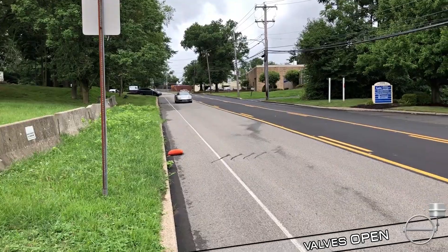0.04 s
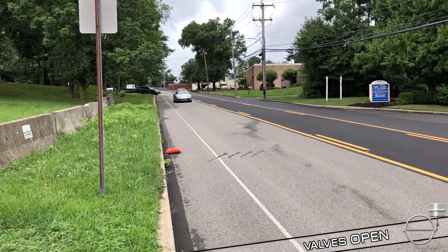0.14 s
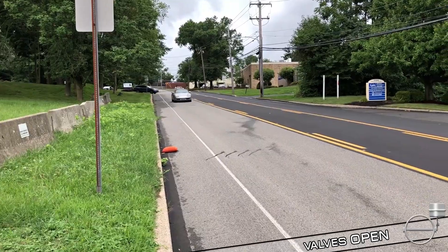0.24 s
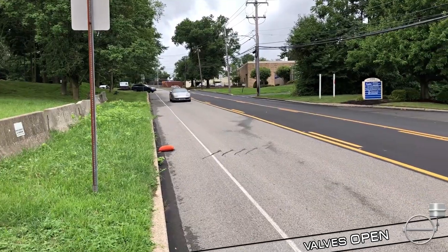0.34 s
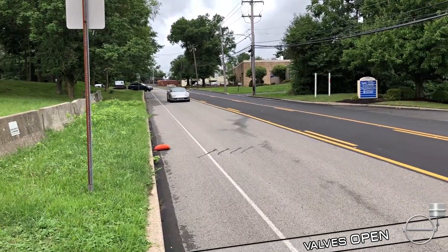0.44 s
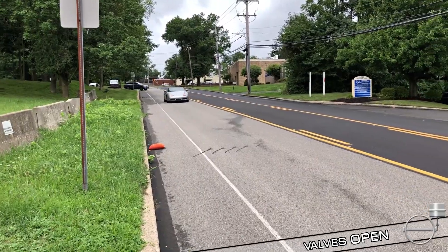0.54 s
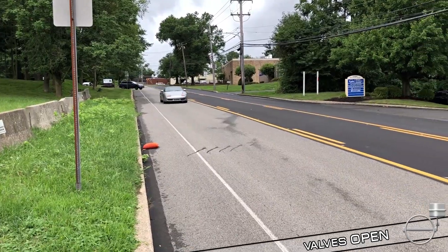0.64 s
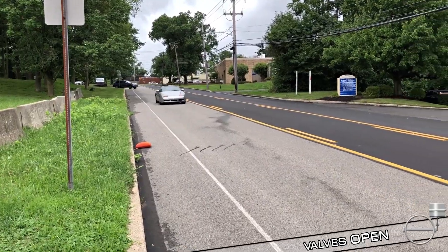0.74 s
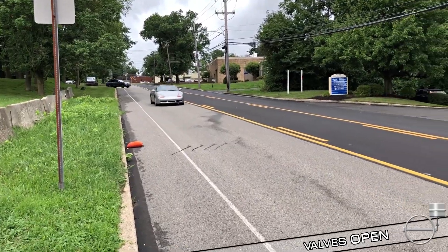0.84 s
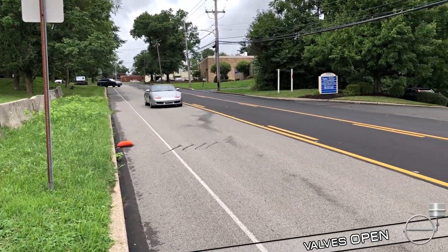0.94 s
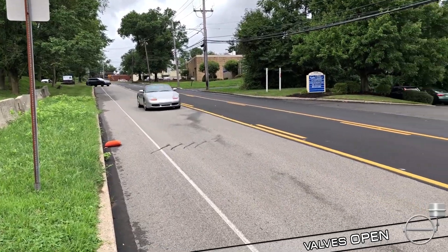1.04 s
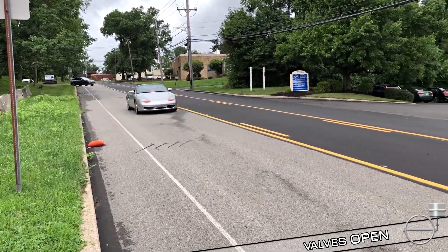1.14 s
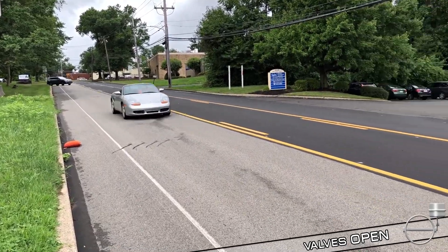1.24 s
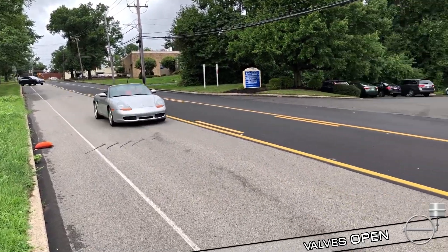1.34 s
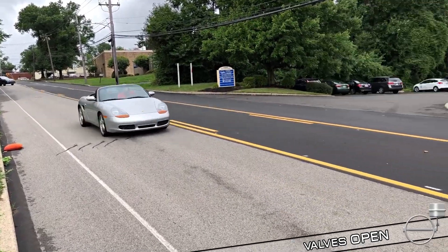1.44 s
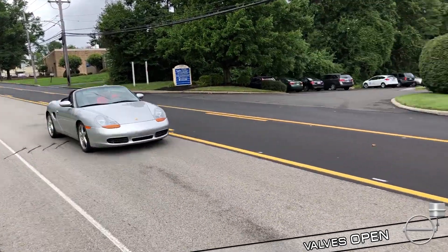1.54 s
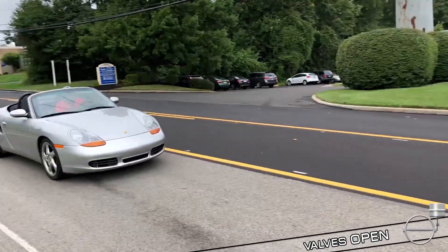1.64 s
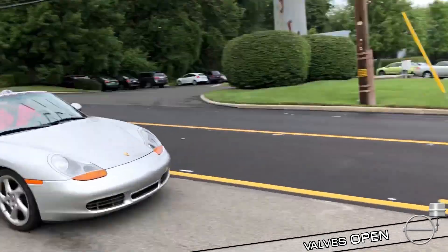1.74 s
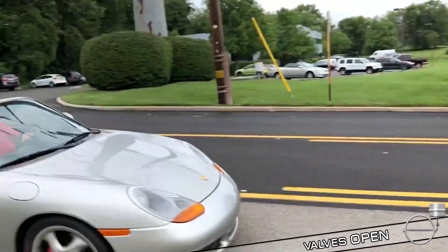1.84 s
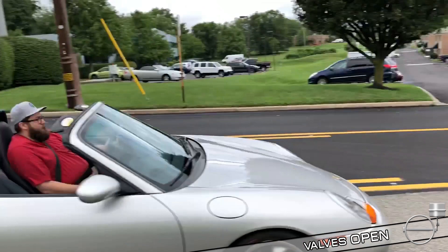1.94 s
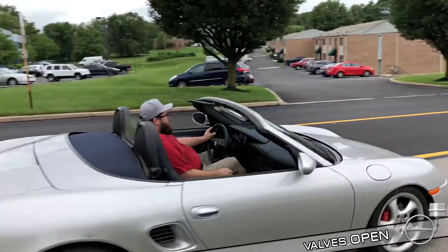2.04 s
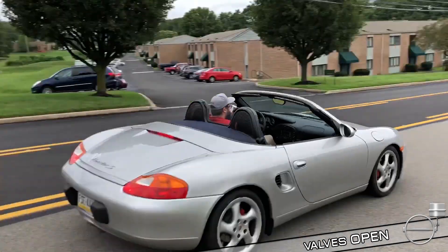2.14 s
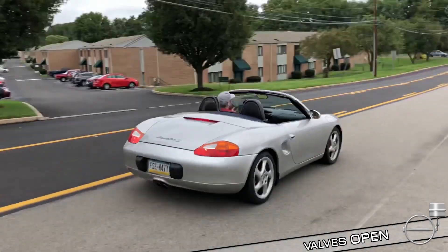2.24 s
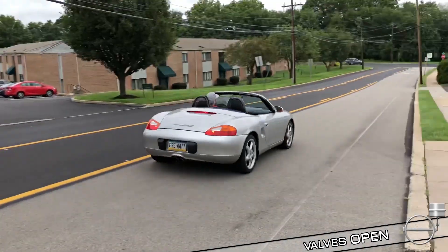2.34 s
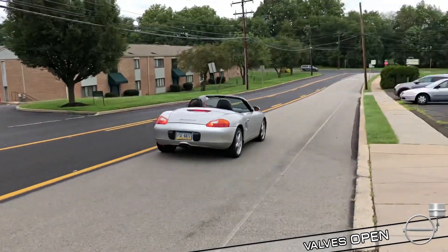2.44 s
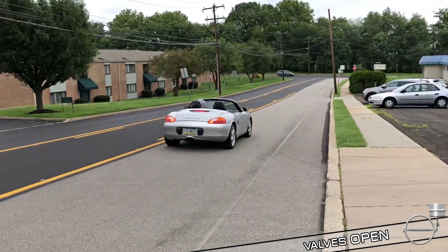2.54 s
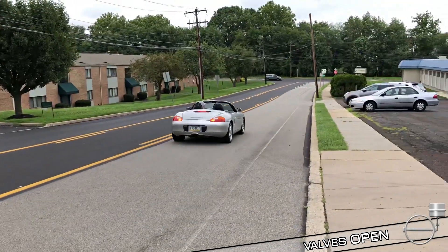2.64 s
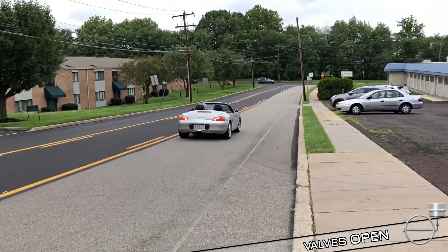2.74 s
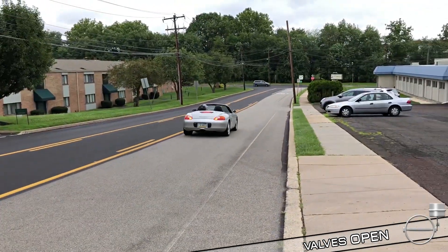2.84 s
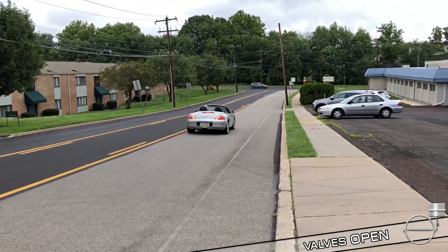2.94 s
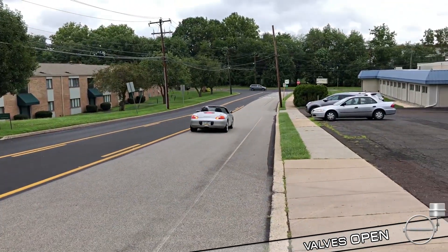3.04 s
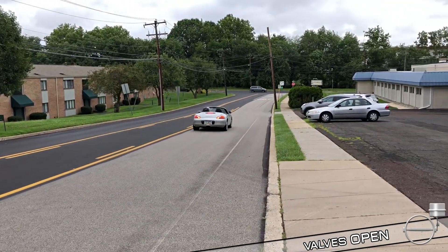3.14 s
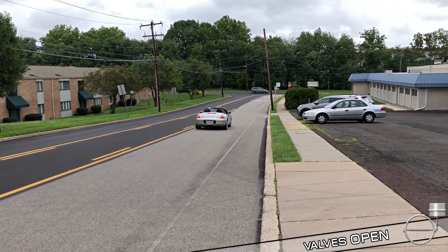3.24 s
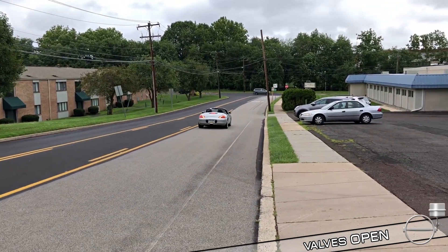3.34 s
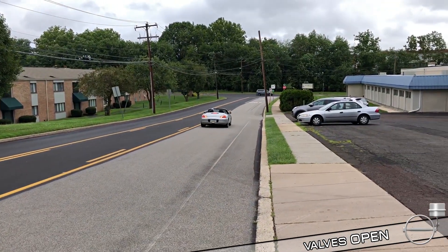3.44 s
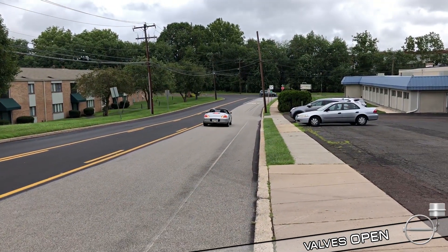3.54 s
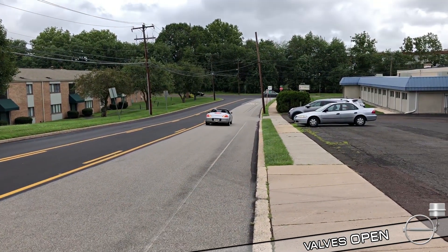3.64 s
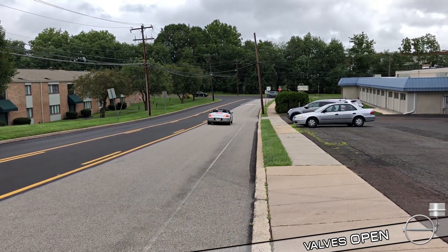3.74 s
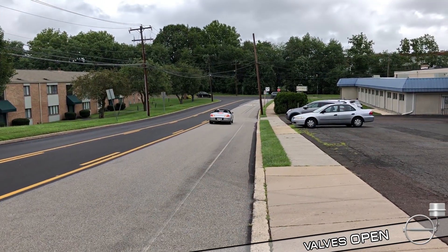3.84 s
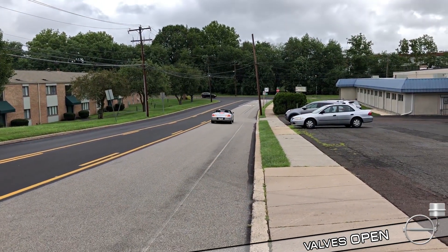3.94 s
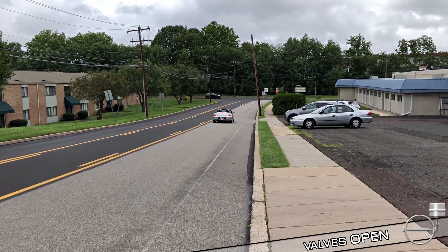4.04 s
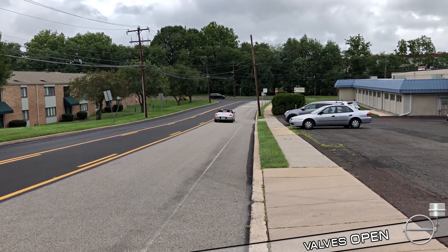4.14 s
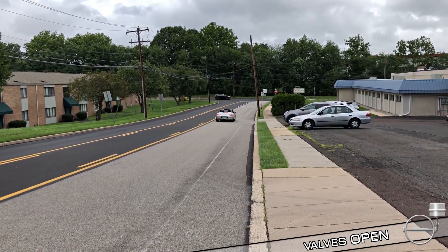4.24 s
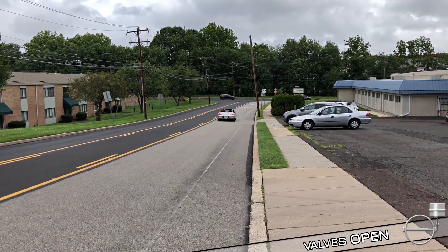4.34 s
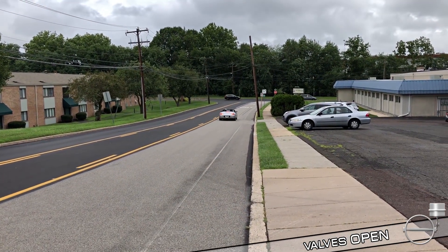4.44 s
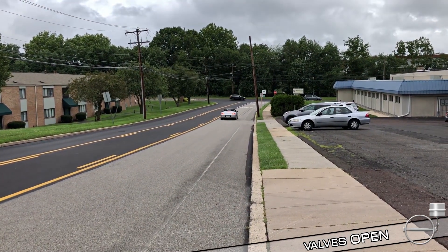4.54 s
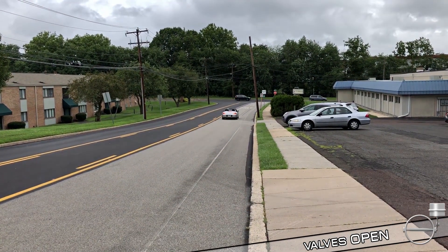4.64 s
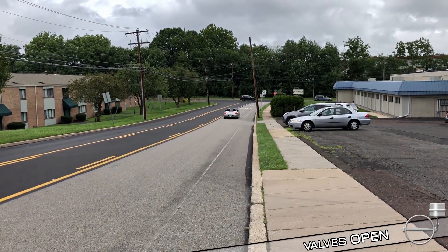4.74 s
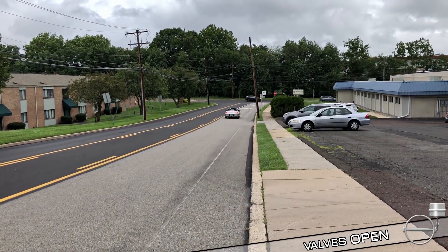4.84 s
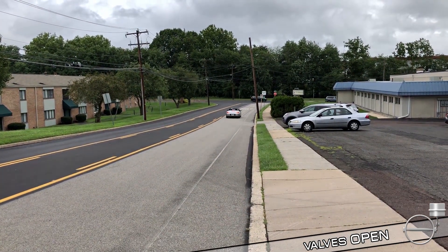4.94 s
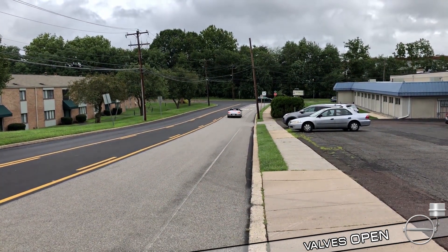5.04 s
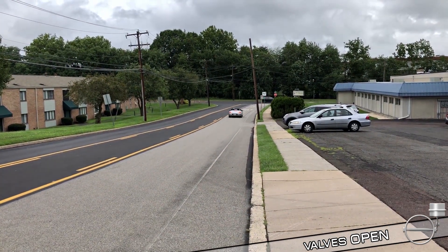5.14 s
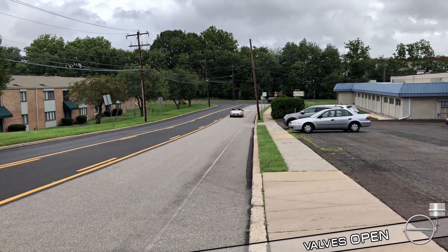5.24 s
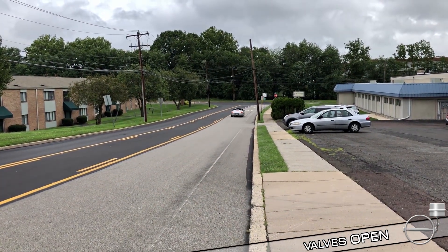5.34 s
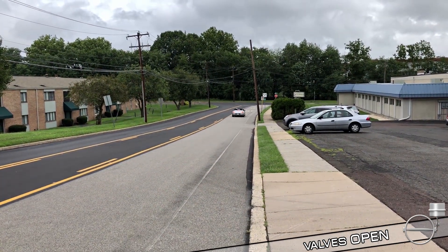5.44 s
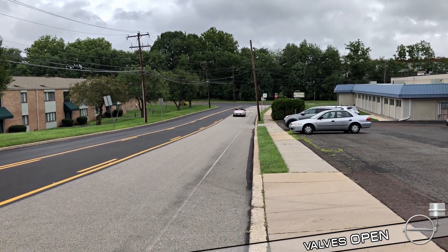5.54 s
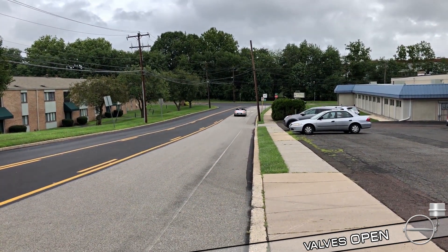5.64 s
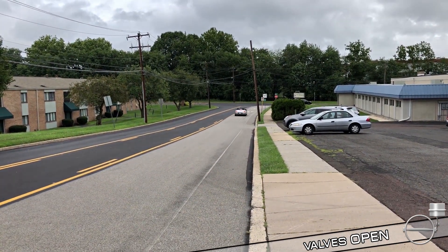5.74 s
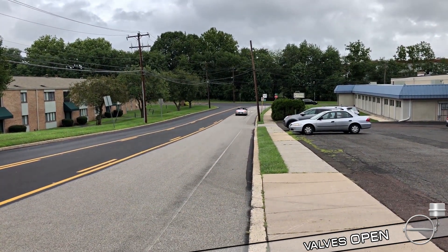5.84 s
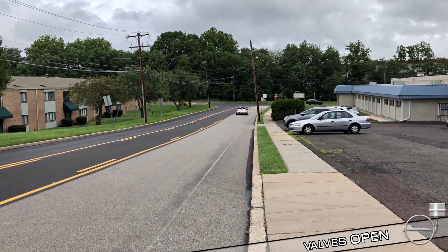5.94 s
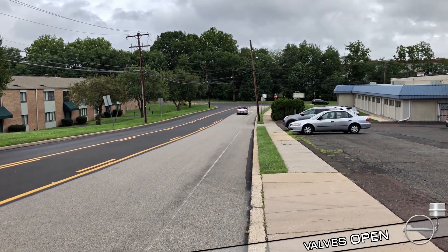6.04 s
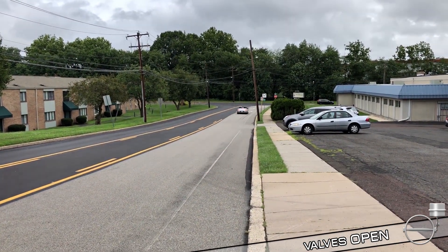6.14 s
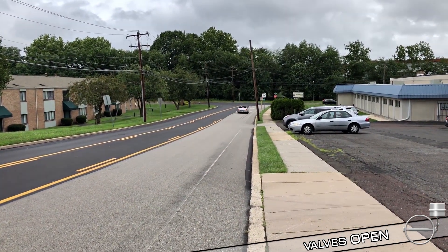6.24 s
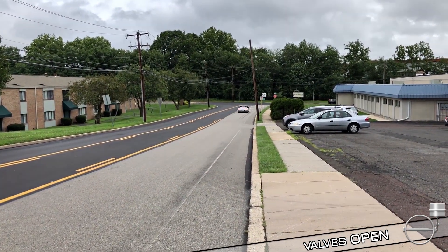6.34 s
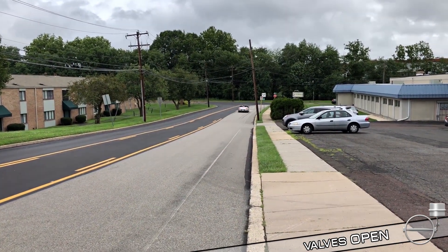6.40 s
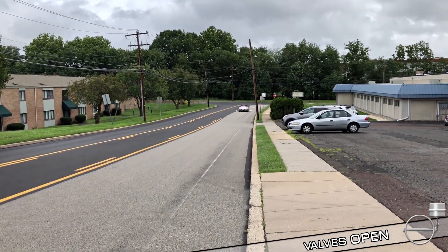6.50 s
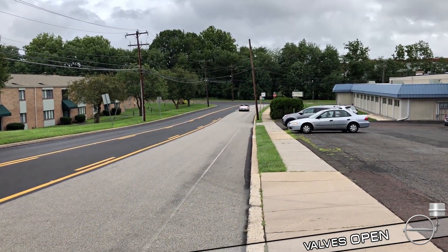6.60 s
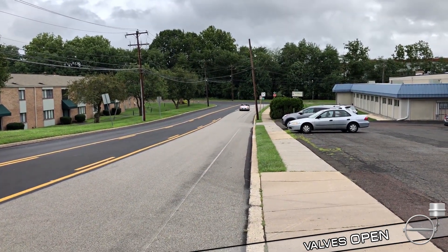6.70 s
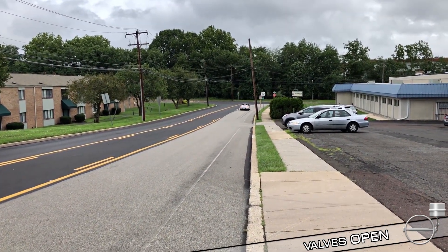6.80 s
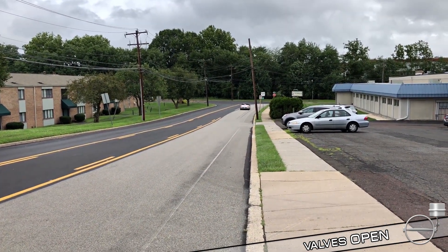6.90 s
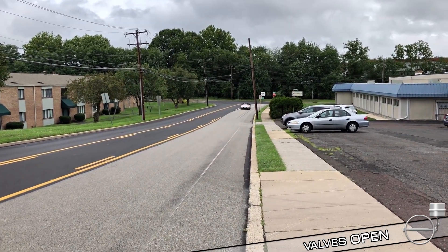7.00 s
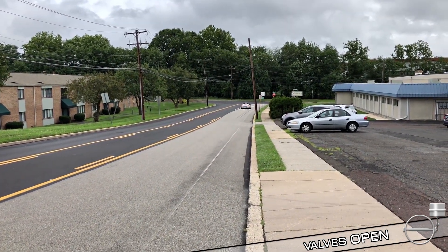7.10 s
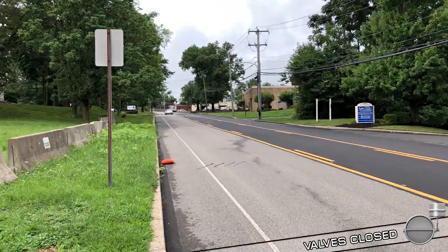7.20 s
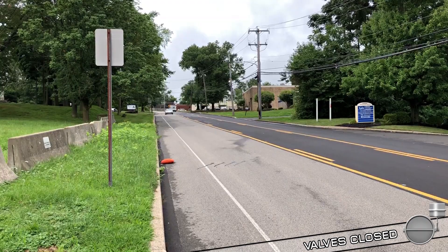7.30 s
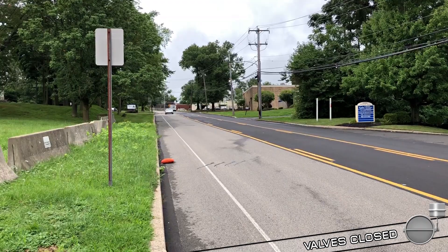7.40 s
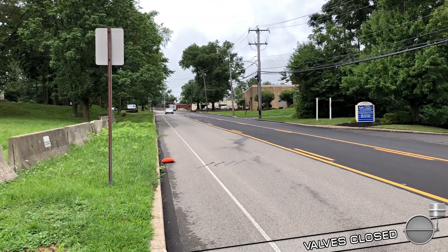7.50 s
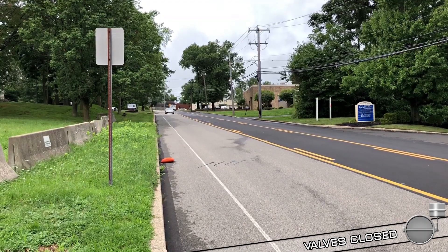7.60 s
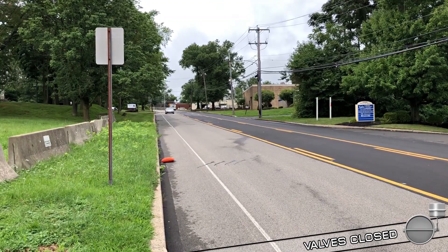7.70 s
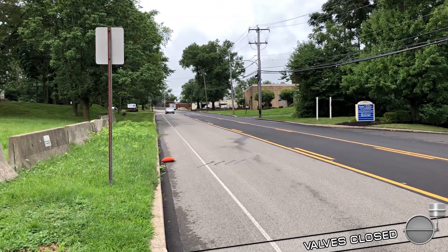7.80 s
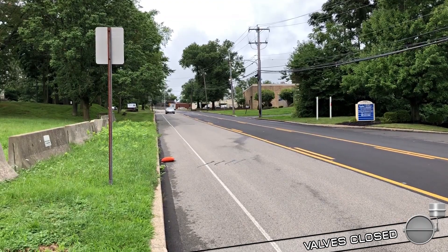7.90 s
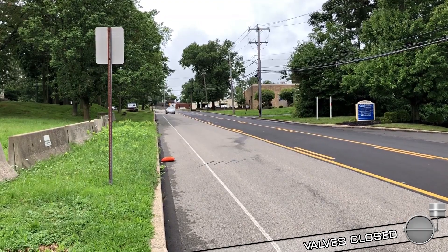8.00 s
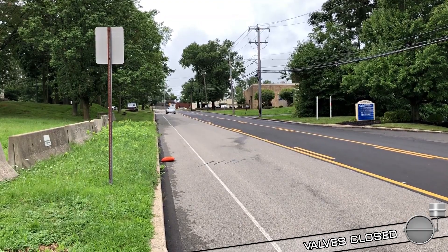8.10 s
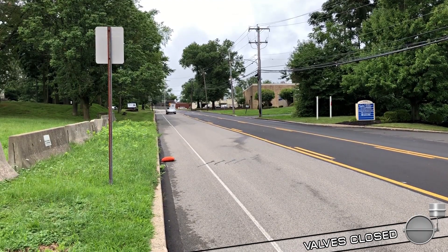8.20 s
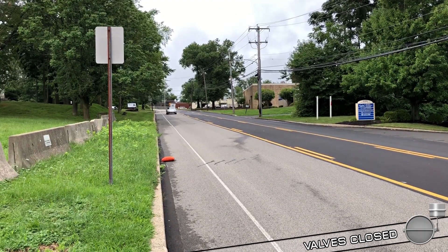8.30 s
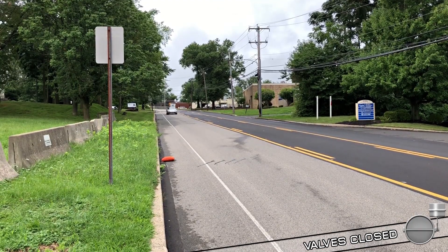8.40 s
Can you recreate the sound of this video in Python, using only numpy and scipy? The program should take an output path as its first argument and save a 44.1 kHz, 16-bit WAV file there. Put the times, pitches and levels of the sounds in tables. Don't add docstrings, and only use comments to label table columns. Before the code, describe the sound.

A sports car rushes past a roadside microphone with a throttle blip, draws away droning, then approaches again faintly after one sharp exhaust crack.

```python
import sys
import numpy as np
from scipy import signal
from scipy.fft import rfft, irfft, next_fast_len
from scipy.io import wavfile
from scipy.ndimage import uniform_filter1d, map_coordinates

SR = 44100
rng = np.random.default_rng(int(sys.argv[2]) if len(sys.argv) > 2 else 0)


def to_wav(sig):
    pcm = np.clip(np.atleast_2d(sig), -1, 1) * 32767
    pcm = np.round(pcm).astype(np.int16)
    wavfile.write(sys.argv[1], SR, pcm.T)


def to_linear_factor(level_db):
    exponent = np.asarray(level_db, float) / 20
    return 10 ** exponent


N = 373086

# [t/s, level/dB]
WIND_BUFFETS = [
    [(0.0, -23.5), (0.12, -26), (0.23, -31), (0.34, -38), (0.41, -60)],
    [(1.9, -67), (1.964, -53), (2.016, -48), (2.062, -31), (2.3, -57)],
]
# [f/Hz, density/dB per Hz]
GUST_SPECTRUM = [(15, -19), (30, -1.5), (60, -6.5), (120, -8.5), (230, -10.5), (320, -23), (450, -35.5)]
# [t/s, f/Hz]
BANK_RATE = [(0, 106.3), (.5, 107.8), (.96, 108.4), (1.9, 95.03), (2.05, 95), (2.35, 73.74), (2.88, 104.5),
             (3.12, 100.5), (4.3, 95.4), (4.9, 90.16), (5.2, 87.15), (5.3, 95.5), (5.45, 100.7),
             (5.9, 79.6), (6.2, 87.14), (6.88, 112.3), (7.1, 104.6), (7.32, 105.2)]
BANK_RATE_AGAIN = [(7.6, 98.9), (8.46, 111.3)]
# [t/s, level/dB]
NEARNESS = [(0, -34.5), (.8, -30.5), (1.13, -28.5), (1.5, -25), (1.77, -20), (2.0, -20.5), (2.22, -20.5),
            (2.5, -25), (2.62, -27), (2.83, -26.5), (3.02, -28.5), (3.5, -32), (4.1, -34), (5.2, -37.5),
            (6.5, -39.5), (7.1, -41), (7.55, -45.5), (8.46, -41.5)]
# [t/s, level/dB]
BANK_DRONE = [(0, -32.5), (.2, -35), (.45, -54), (.96, -46), (1.08, -31.5), (1.42, -25.5), (1.85, -18),
              (2.1, -11.5), (2.42, -26), (3.0, -31), (4.9, -37), (5.6, -44), (6.25, -39.5), (6.9, -36),
              (7.2, -33.5), (7.55, -53), (8.1, -53), (8.46, -47)]
# [t/s, level/dB, half length/s]
DRONE_SWINGS = [(.72, 8, 0.11), (2.087, 3.5, 0.059), (1.56, -13, 0.11), (3.258, -7, 0.032), (3.473, 9, .05),
                (3.598, -16, 0.085), (4.322, -7, 0.059), (5.047, -8, .06), (5.656, 4, 0.025),
                (5.992, -6, 0.085), (7.81, -15, 0.067), (3.92, 1, .04), (6.435, -9, 0.11), (7.02, -1, .04)]
# [start t/s, end t/s, firing line level/dB, fading/dB per s]
LOADS = [
    (0, 0.83, -34, -0.5),
    (2.706, 4.95, -30.5, 7),
    (6.504, 7.283, -43.5, 2),
]
# [start t/s, end t/s, firing line level/dB, bark level/dB, bark lag/s]
THROTTLE_BLIPS = [
    (1.931, 2.049, -16, -39, -0.0085),
    (5.31, 5.405, -22.5, -29.5, 0.024),
]
# [f/Hz, width/Hz, level/dB]
THIRD_BOOM = (242, 38, 23.9)
# [multiple of the engine cycle, level/dB]
UPPER_LINES = [(12, -1.5), (16, -3), (18, -4), (13, -16), (14, -12), (20, -11.5)]
BARK_LINES = [(12, -15), (15, -2.5), (18, 2), (21, -22), (24, -20), (27, -4.5), (30, -6), (33, -1.5),
              (36, -5), (39, -2)]
# [f/Hz, width/Hz, level/dB]
PIPE_MODES = [(1150, 340, 3.5), (2210, 430, 5.5), (3380, 1100, -8.5), (6960, 2000, -17), (13000, 4000, -38)]
# [f/Hz, density/dB per Hz]
BODY_SPECTRUM = [(30, -45), (60, 2.5), (120, 2.5), (300, 1.5), (400, -11.5), (520, -3.5), (700, -2.5),
                 (1000, -17)]
TREAD_SPECTRUM = [(260, -26), (450, -6.5), (575, -7), (621, -8.5), (767, -12), (849, -3), (972, -1),
                  (1360, -5), (1680, -3.5), (2080, -5.5), (2730, -18.5), (3400, -31.5), (4420, -50),
                  (7480, -120)]
HISS_SPECTRUM = [(1530, -10), (2600, -1), (2980, 0), (4260, -9), (5760, -9.5), (8000, -19.5), (10400, -22),
                 (17600, -120)]
AIR_SPECTRUM = [(4120, 0.5), (7000, -1), (8110, -2), (9800, -7), (11200, -6.5), (12600, -1.5),
                (14900, -9.5), (15750, -7)]
# [level when abreast/dB, growth with nearness, extra from behind/dB, extra under load/dB]
ROAD_LAYERS = [
    (-29, 1.183, 3.5, -0.5),
    (-21, 1.081, -0.38, -0.05),
    (-36.5, 1.26, 4, 0.5),
    (-50, 1.8, 9, 5.5),
]
# [f/Hz, density/dB per Hz]
FAR_SPECTRUM = [(20, -35), (60, -2), (130, 2), (400, -15), (1100, -19), (2500, -23), (8000, -38),
                (15700, -53)]
# [t/s, level/dB, centre f/Hz]
BRAKE_SQUEAL = [(1.06, -71, 13800), (1.124, -52, 13800), (1.234, -51.5, 13800), (1.42, -38.5, 13700),
                (1.432, -41, 13600), (1.454, -40, 13930), (1.784, -33.5, 13700), (1.92, -54, 13390)]
# [start t/s, end t/s, level/dB, f/Hz, width/Hz]
NOISE_SWELLS = [(3.16, 3.32, -50, 3008, 2070), (3.499, 4.404, -37, 1020, 260),
                (4.05, 4.143, -52, 4990, 3500), (4.69, 5.097, -42, 1324, 300.2),
                (6.72, 7.2, -45.5, 2200, 610), (6.78, 7.247, -59.5, 5090, 2200),
                (1.634, 1.764, -34.5, 248, 25.04), (1.93, 2.012, -25, 750, 120),
                (2.072, 2.19, -33, 3700, 2200), (7.753, 8.46, -59.5, 3680, 804),
                (8.251, 8.459, -65, 947, 60)]
# [t/s, level/dB, f/Hz]
CRICKET_CHIRPS = [(7.125, -66, 9500), (7.1841, -59, 9190), (7.2908, -65, 9500), (7.4584, -64, 9480),
                  (7.5053, -58, 9150), (7.5494, -73, 9700), (7.6443, -66, 9380), (7.7188, -58, 9090),
                  (7.7894, -67, 9740), (7.8241, -64, 9480), (7.9197, -57, 9130), (8.027, -63, 9540),
                  (8.1604, -57, 9070), (8.2446, -61, 9540), (8.321, -65, 8820), (8.3958, -58, 9150)]
# [t/s, level/dB]
EXHAUST_POPS = [
    (7.568, -36),
    (7.5754, -27.5),
    (7.578, -38),
    (7.587, -36),
]

PASS_S, TURN_S, CUT_S = 1.86, 0.05, 7.43
PULL_RISE, PULL_FALL = 85, 95.6
BLIP_RISE, BLIP_FALL, ECHO_S = 213, 360, 0.14


def unit(x):
    return x / np.sqrt(np.mean(x ** 2) + 1e-20)


def curves(rows, outside=None):
    s, *cols = np.transpose(rows)
    return [np.interp(np.arange(N) / SR, s, c, outside, outside) for c in cols]


def wobble(rate):
    return map_coordinates(rng.standard_normal(int(N * rate / SR) + 4), [np.arange(N) * rate / SR])


def filtered(x, response):
    m = next_fast_len(N + SR // 4)
    return irfft(rfft(x, m) * response(np.fft.rfftfreq(m, 1 / SR)), m)[:N]


def rush(spectrum, patchy_db):
    z = signal.stft(rng.standard_normal(N), nperseg=512)[2]
    field = uniform_filter1d(uniform_filter1d(rng.standard_normal(z.shape), 5, 0), 10, 1)
    noise = signal.istft(z * to_linear_factor(patchy_db * unit(field)), nperseg=512)[1][:N]
    f, db = np.transpose(spectrum)
    return unit(filtered(noise, lambda hz: to_linear_factor(np.interp(np.log(hz + 1), np.log(f), db, -120, -120))))


def held(start, end, rise, fall):
    t = np.arange(N) / SR
    return -rise * np.maximum(start - t, 0) - fall * np.maximum(t - end, 0)


def rear():
    t = np.arange(N) / SR
    return (np.tanh((t - PASS_S) / TURN_S) - np.tanh((t - CUT_S) / TURN_S)) / 2


def blip(start, end, echo_db):
    stab = to_linear_factor(held(start, end, BLIP_RISE, BLIP_FALL))
    return stab + to_linear_factor(echo_db + held(end, end + ECHO_S, BLIP_RISE, BLIP_FALL))


def blips_open():
    return sum(to_linear_factor(held(a, b, BLIP_RISE, BLIP_FALL)) for a, b, *_ in THROTTLE_BLIPS)


def wind():
    gust_db, wake_db = (curves(rows, -120)[0] for rows in WIND_BUFFETS)
    lumps = to_linear_factor(1.5 * wobble(34.6))
    gust = unit(lumps * rush(GUST_SPECTRUM, patchy_db=3.0))
    wake = rush([(15, -7), (40, -2), (70, -17), (120, -40)], patchy_db=8.0)
    return to_linear_factor(gust_db + 5.5) * gust + to_linear_factor(wake_db) * wake


def orders(cycle, table, drift, flutter_db):
    total = 0
    for k, db in table:
        gain = np.sqrt(2) * to_linear_factor(db + flutter_db * wobble(12))
        lag = -0.12 * k * np.log(k)
        total = total + gain * np.cos(2 * np.pi * k * cycle + drift * wobble(8) + lag)
    return total


def exhaust(cycle, bank_hz, near_db):
    t = np.arange(N) / SR
    pull = sum(to_linear_factor(db - fade * (t - a) + held(a, b, PULL_RISE, PULL_FALL)) for a, b, db, fade in LOADS)
    stab = sum(to_linear_factor(db) * blip(a, b, echo_db=-12) for a, b, db, _, _ in THROTTLE_BLIPS)
    echo_db = sum(db * np.exp(-((t - s) / w) ** 2) for s, db, w in DRONE_SWINGS)
    bank = to_linear_factor(curves(BANK_DRONE)[0] - 11 * blips_open() + echo_db)
    coast = to_linear_factor(0.69 * near_db)
    firing = pull + stab + to_linear_factor(-36) * coast
    turn = to_linear_factor(-4.5) * pull * rear() + to_linear_factor(-35) * coast
    boom_hz, width_hz, boom_db = THIRD_BOOM
    boom = boom_db * np.exp(-((3 * bank_hz - boom_hz) / width_hz) ** 2)
    third = to_linear_factor(1.7 * near_db - 9.5 + boom) + to_linear_factor(-14) * stab
    third = third + to_linear_factor(-17) * pull * (1 - rear())
    # (multiple of the cycle, gain, flutter dB)
    lines = [(2, to_linear_factor(-11.0) * turn, 1.6), (3, bank, 1.86), (4, turn, 1.607), (6, firing, 2.1), (9, third, 1.16)]
    drone = sum(gain * orders(cycle, [(k, 0)], drift=0.13, flutter_db=flutter) for k, gain, flutter in lines)
    upper_gain = to_linear_factor(0.89 * near_db - 29.5 + 12 * rear())
    return drone + upper_gain * orders(cycle, UPPER_LINES, drift=0.29, flutter_db=2.5)


def pipe(f):
    total = 0
    for k, (c, w, db) in enumerate(PIPE_MODES):
        total = total + (-1) ** k * to_linear_factor(db) * 1j * f * w / (c * c - f * f + 1j * f * w)
    return total


def throttle_bark(cycle, near_db):
    t = np.arange(N) / SR
    throttle = rasp = 0
    for a, b, _, db, lag in THROTTLE_BLIPS:
        opening = to_linear_factor(db) * blip(a + lag, b, echo_db=-18.5)
        throttle = throttle + opening
        rasp = rasp + to_linear_factor(-70 * np.abs(t - a - lag)) * opening
    bark = to_linear_factor(-6.5) * orders(cycle, BARK_LINES, drift=0.37, flutter_db=2.0)
    since_pulse = (3 * cycle) % 1
    puff = (np.exp(-since_pulse / 0.59) + 0.081) * rng.standard_normal(N)
    body = to_linear_factor(near_db + 2.5) * blips_open() * rush(BODY_SPECTRUM, patchy_db=1.5)
    return throttle * bark + to_linear_factor(2.0) * rasp * unit(filtered(puff, pipe)) + body


def engine():
    bank_hz = curves(BANK_RATE + BANK_RATE_AGAIN)[0]
    near_db = curves(NEARNESS)[0]
    cycle = np.cumsum(bank_hz / 3) / SR
    return exhaust(cycle, bank_hz, near_db) + throttle_bark(cycle, near_db)


def road():
    near_db = curves(NEARNESS)[0] + 21
    load = sum(to_linear_factor(held(a, b, PULL_RISE, PULL_FALL)) for a, b, *_ in LOADS)
    body_db, tread_db, hiss_db, air_db = (db + grows * near_db + rear_db * rear() + load_db * load
                                          for db, grows, rear_db, load_db in ROAD_LAYERS)
    bumps = wobble(14)
    grit = to_linear_factor(0.75 * wobble(150))
    direct = (to_linear_factor(body_db) * rush(BODY_SPECTRUM, patchy_db=2.5)
              + to_linear_factor(tread_db + 0.17 * bumps) * unit(grit * rush(TREAD_SPECTRUM, patchy_db=0.93))
              + to_linear_factor(hiss_db + 0.5 * bumps) * unit(grit * rush(HISS_SPECTRUM, patchy_db=2.16))
              + to_linear_factor(air_db + 2 + 0.3 * bumps) * rush(AIR_SPECTRUM, patchy_db=0.1))
    lag_s = 0.00017 + 0.0025 * to_linear_factor(1.525 * uniform_filter1d(near_db, size=SR // 4))
    return direct + 0.12 * map_coordinates(direct, [np.arange(N) - SR * lag_s], order=3)


def distance():
    return to_linear_factor(-47 + 2 * rear() + 0.66 * wobble(1.78)) * rush(FAR_SPECTRUM, patchy_db=0.2)


def brake():
    squeal_db = curves(BRAKE_SQUEAL, -120)[0]
    centre_hz = curves(BRAKE_SQUEAL)[1]
    phase = 2 * np.pi * np.cumsum(centre_hz) / SR
    core = wobble(500) * np.cos(phase) + wobble(500) * np.sin(phase)
    skirt = rush([(11500, -23), (12200, -10), (13200, 4), (14200, -8), (14800, -12), (15700, -28)], patchy_db=2.2)
    return to_linear_factor(squeal_db + 1.6 * wobble(58.4)) * (unit(core) + to_linear_factor(-2.5) * skirt)


def swells():
    total = 0
    for a, b, db, hz, width_hz in NOISE_SWELLS:
        band = filtered(rng.standard_normal(N), lambda f: np.exp(-((f - hz) / width_hz) ** 2))
        gain = to_linear_factor(db + held(a, b, rise=65, fall=107) + 0.96 * wobble(12))
        total = total + gain * unit(band)
    return total


def crickets():
    out, t = np.zeros(N + SR), np.arange(int(.07 * SR)) / SR
    swell = np.sin(np.pi * t / t[-1]) ** 0.91
    strokes = np.abs(np.sin(np.pi * 130 * t)) ** 1.4
    for s, db, hz in CRICKET_CHIRPS:
        jitter = .1 * np.cumsum(rng.standard_normal(len(t)))
        tone = np.sin(2 * np.pi * hz * t + jitter)
        out[round((s - .012) * SR):][:len(t)] += to_linear_factor(db + 1.5) * swell * strokes * tone
    return out[:N]


def pop():
    out, t = np.zeros(N), np.arange(-200, 200) / SR
    crack = np.exp(-(t / 0.00065) ** 2) * np.sin(2 * np.pi * 1750 * t)
    for s, db in EXHAUST_POPS:
        out[round(s * SR) - 200:][:len(t)] += to_linear_factor(db) * crack
    return out


def scene():
    return (wind() + engine() + road() + distance() + brake() + swells() + crickets() + pop())[None]


def top_cut(x):
    return signal.sosfilt(signal.butter(12, 15710, fs=SR, output="sos"), x)


def record(dry):
    mix = dry / (1 + np.abs(dry / 0.72) ** 6) ** (1 / 6)
    return top_cut(mix)


dry = scene()
out = record(dry)
to_wav(out)
```